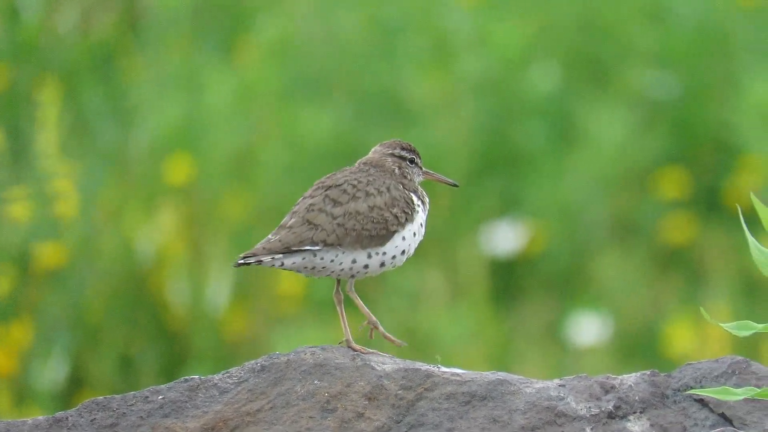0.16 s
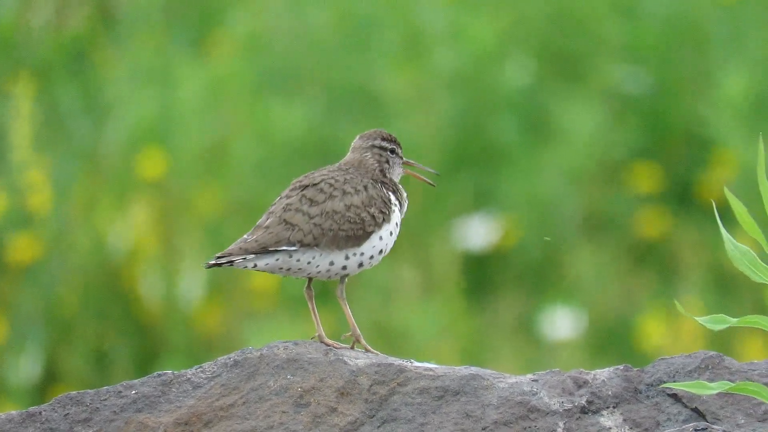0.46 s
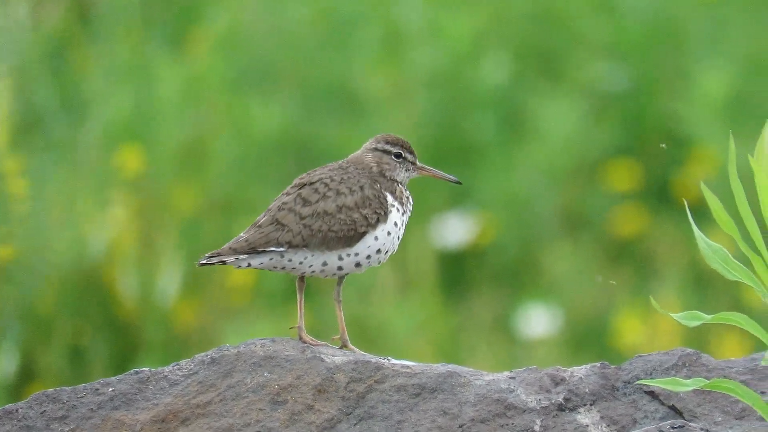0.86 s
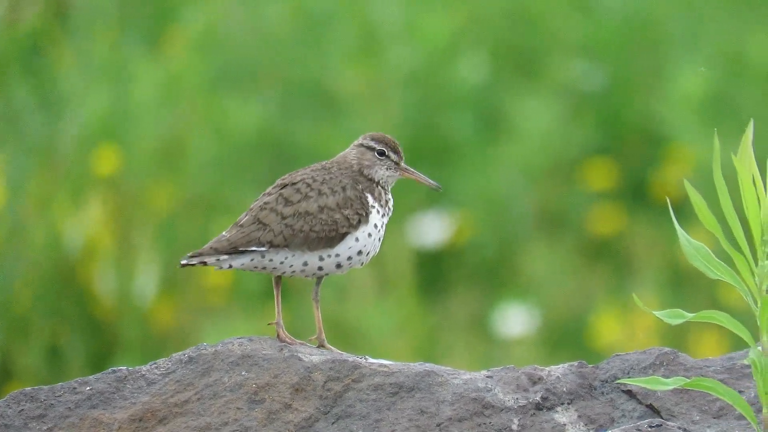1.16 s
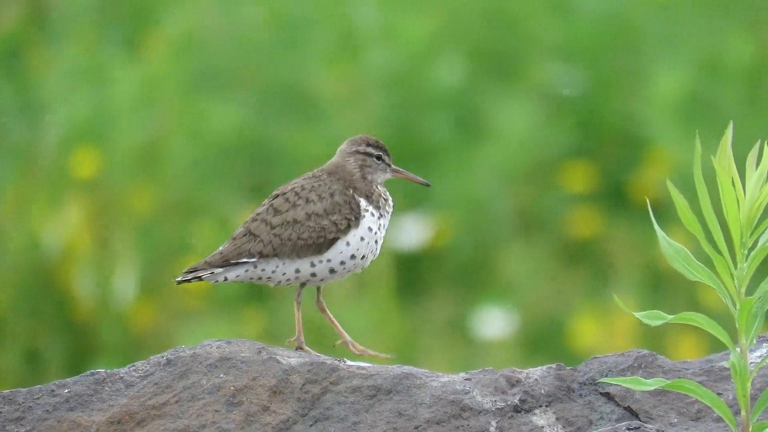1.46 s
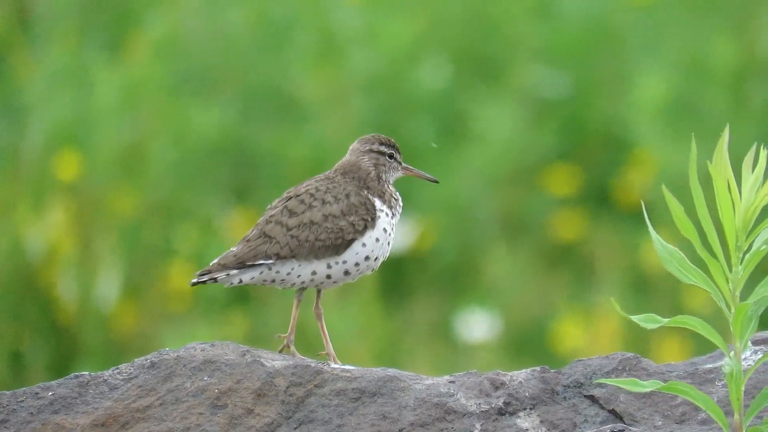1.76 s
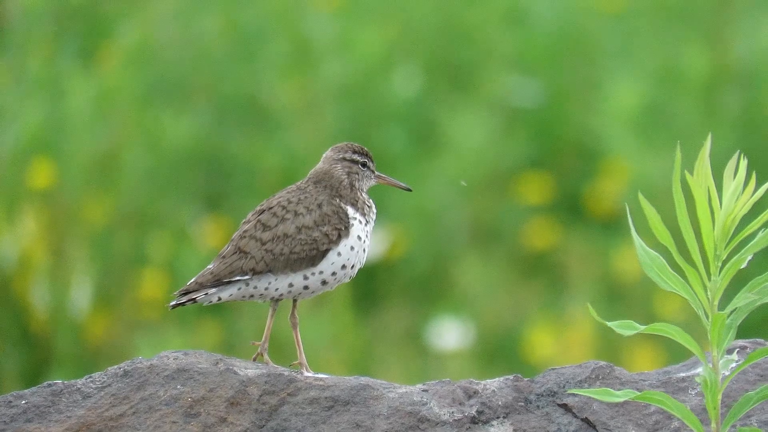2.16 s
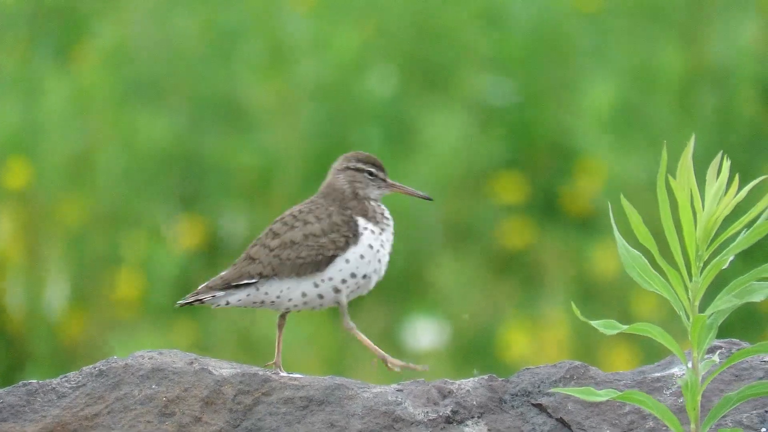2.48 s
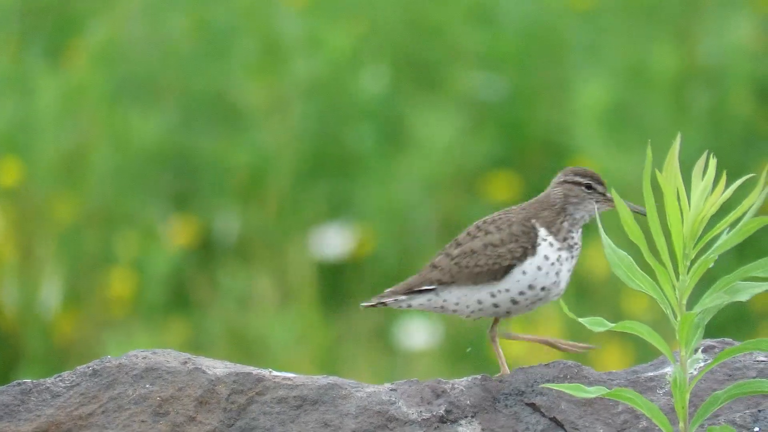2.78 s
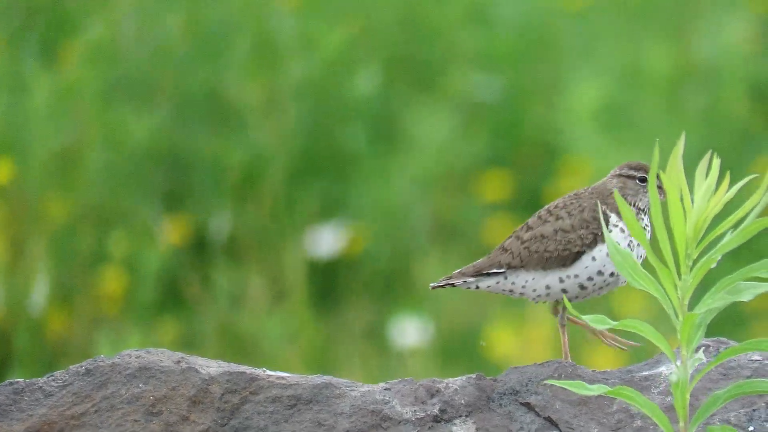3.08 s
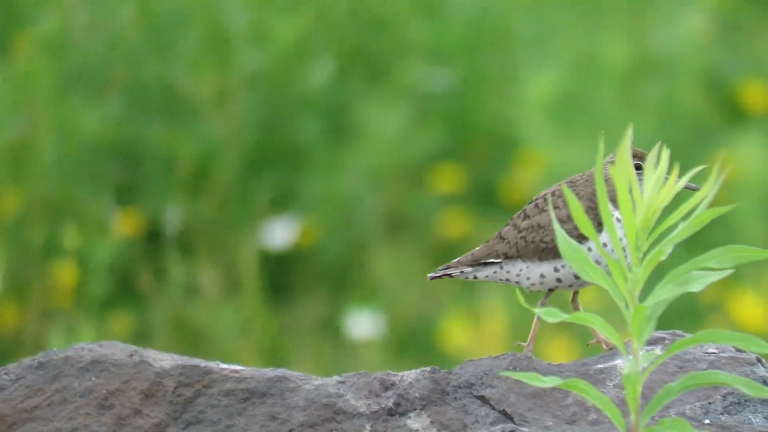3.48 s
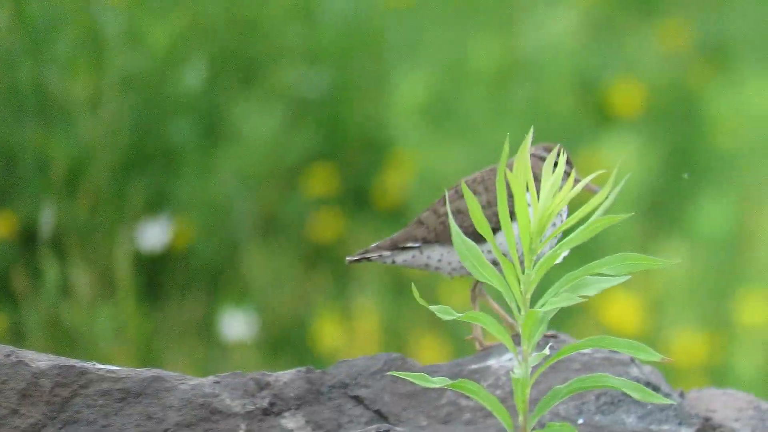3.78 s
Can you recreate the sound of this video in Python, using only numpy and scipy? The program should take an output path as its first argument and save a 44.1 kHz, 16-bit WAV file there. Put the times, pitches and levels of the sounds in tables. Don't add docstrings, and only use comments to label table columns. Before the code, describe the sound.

A small shorebird gives isolated high peeps, early, then before the middle, then late, with thin distant birdsong behind; steady low traffic hum, small handling clicks, and a burst of low wind buffeting on the camera microphone.

```python
import sys
import numpy as np
from scipy import signal
from scipy.io import wavfile
from scipy.ndimage import uniform_filter1d

SR = 44100
rng = np.random.default_rng(int(sys.argv[2]) if len(sys.argv) > 2 else 0)


def master_out(mix):
    frames = np.transpose(np.atleast_2d(mix))
    ceiling = np.clip(frames, -1, 1)
    pcm = np.round(ceiling * 32767).astype(np.int16)
    wavfile.write(sys.argv[1], SR, pcm)


def gain_from_db(level_db):
    decades = np.asarray(level_db, float) / 20
    return 10 ** decades


N = 173313


def evened(x):
    return x / np.sqrt(np.mean(x ** 2) + 1e-20)


def read(points, hz):
    f, value = np.transpose(points)
    return np.interp(np.log(hz + 1), np.log(f + 1), value)


def curve(points, column=1):
    return np.interp(np.arange(N) / SR, *np.transpose(points)[[0, column]])


def wobble(count, size):
    smooth = uniform_filter1d(rng.standard_normal(count), size)
    return evened(uniform_filter1d(smooth, size))


def add(mix, s, sound):
    part = mix[..., round(s * SR):][..., :sound.shape[-1]]
    part += sound[..., :part.shape[-1]]


def resonate(x, hz, width_hz):
    pole = np.exp((2j * np.pi * hz - np.pi * width_hz) / SR)
    return 2 * signal.lfilter([1 - abs(pole)], [1, -pole], x).real


def lowpass(order, hz):
    return signal.butter(order, hz, fs=SR, output="sos")


def sandpiper():
    # time_s, pitch_hz, level_db
    peeps = [
        [(.629, 1850, -62), (.637, 2130, -53), (.642, 2540, -52), (.648, 3200, -46), (.654, 3390, -43.5),
         (.664, 3551, -41), (.692, 3460, -47.5), (.7, 3300, -48), (.71, 2650, -50)],
        [(1.374, 2170, -52), (1.38, 2390, -44), (1.385, 2880, -40), (1.39, 3170, -47), (1.398, 3680, -40.5),
         (1.405, 3660, -43), (1.4075, 3420, -47), (1.411, 3280, -38), (1.432, 3230, -43.5), (1.441, 2800, -46)],
        [(2.846, 2010, -57), (2.854, 3100, -43), (2.86, 3900, -46), (2.87, 3928, -38.5), (2.898, 3920, -37.5),
         (2.906, 3880, -44), (2.913, 3880, -56)],
    ]
    # second_db, third_db
    overtones = [(-21.5, -48), (-21, -29), (-31, -28)]
    flutter_db = 3
    out = np.zeros(N)
    for peep, (second_db, third_db) in zip(peeps, overtones):
        s, hz, db = np.transpose(peep)
        t = np.arange(s[0], s[-1], 1 / SR)
        phase = 2 * np.pi * np.cumsum(np.interp(t, s, hz)) / SR
        level_db = np.interp(t, s, db)
        effort = gain_from_db((level_db - db.max()) * 0.43)
        upper = gain_from_db(second_db) * np.sin(2 * phase) + gain_from_db(third_db) * np.sin(3 * phase)
        tone = np.sin(phase) + effort * upper
        level = gain_from_db(level_db + flutter_db * wobble(len(t), size=110))
        level = level * signal.windows.tukey(len(t), 0.1)
        add(out, s[0], np.sqrt(2) * level * tone)
    return out + rock_scatter(out)


def rock_scatter(call):
    echo_db, t60_s, gap_s = -11.5, 0.1, 0.004
    t = np.arange(8000) / SR
    tail = rng.standard_normal((2, len(t))) * gain_from_db(-60 * t / t60_s) * (t > gap_s)
    tail = tail / np.linalg.norm(tail[0])
    return gain_from_db(echo_db) * signal.fftconvolve(call[None], tail, axes=1)[:, :N]


def whistle(length_s, db, start_hz, end_hz):
    # pitch_hz, left_minus_right_db
    whistle_pan = [
        (3300, 5),
        (3800, 3.2),
        (4400, -4.5),
    ]
    u = np.arange(0, 1, 1 / (length_s * SR))
    hz = (start_hz + (end_hz - start_hz) * u) * (1 + 0.0035 * wobble(len(u), size=300))
    swell = np.sin(np.pi * u ** 0.79) ** 0.61
    level = gain_from_db(db + 1.85 * wobble(len(u), size=500)) * swell
    side_db = read(whistle_pan, start_hz) / 2
    pan = gain_from_db(np.array([[side_db], [-side_db]]))
    return pan * np.sqrt(2) * level * np.sin(2 * np.pi * np.cumsum(hz) / SR)


def far_birds():
    # start_s, length_s, level_db,
    # start_hz, end_hz
    whistles = [(.722, .055, -62.5, 3570, 3510), (.87, 0.11, -59, 3310, 3250),
                (1.195, 0.17, -59, 4540, 4510), (1.969, 0.096, -60, 4400, 4380),
                (1.577, 0.13, -57.5, 4390, 4450), (1.7, 0.12, -68, 4440, 4440),
                (1.805, 0.025, -62, 4350, 3470), (1.818, 0.015, -58, 3370, 3320),
                (1.838, .016, -61, 3380, 3380), (.638, 0.0065, -57, 4300, 4870),
                (1.935, 0.27, -54, 3800, 3780), (2.325, 0.21, -49.5, 3720, 3760),
                (2.919, 0.027, -55, 3910, 3910), (3.591, 0.14, -58.5, 2620, 2700),
                (3.84, 0.058, -58.5, 5630, 5420)]
    # offset_s, length_s, level_db, start_hz, end_hz
    trill = [
        (.002, 0.02, -46.5, 2624, 2394),
        (0.067, 0.016, -65, 5800, 5350),
        (0.117, .014, -63, 7300, 6700),
        (.127, 0.012, -58, 6040, 4700),
    ]
    trill_start_s, turn_s, swell_db = 2.624, 0.1675, 0.5
    out = np.zeros((2, N))
    for s, *row in whistles:
        add(out, s, whistle(*row))
    for k in range(5):
        for offset_s, *row in trill:
            s = trill_start_s + k * turn_s + offset_s
            add(out, s, gain_from_db(swell_db * (k + 1.5)) * whistle(*row))
    return out


def wind_buffets():
    # centre_s, length_s, peak_db, swirl_hz, port_lag_turns
    buffets = [(1.69, 0.022, -23, 87, 0.32), (1.776, .025, -20.5, 129, 0.41), (1.97, 0.045, -30.5, 76, 0.2),
               (2.055, 0.037, -31, 152, 0.56), (2.27, 0.022, -21, 156.5, 0.3),
               (2.284, 0.036, -24, 68, 0.28), (2.62, 0.037, -31.5, 130, 0.42),
               (2.753, .022, -21, 151, 0.38), (2.799, 0.049, -28, 75, 0.22),
               (3.261, 0.027, -14.5, 106, 0.35), (3.277, .013, 5, 187, 0.4), (3.288, 0.017, -1, 132, 0.34),
               (3.315, 0.017, -13, 153, 0.22), (3.388, 0.12, -14.5, 98, 0.15),
               (3.43, .07, -13.5, 105.8, 0.062), (3.47, 0.055, -13.5, 161, 0.24),
               (3.515, .014, -11, 194, 0.25), (3.529, 0.016, -4.5, 200, 0.36),
               (3.594, 0.018, -10.5, 224, 0.37), (3.645, 0.016, -8.5, 286, 0.42),
               (3.668, 0.041, -20, 177, 0.37), (3.751, 0.054, -24, 132, 0.2)]
    swirl_rough, flap_db, flap_share = 0.15, -6.5, 1.48
    out = np.zeros((2, N))
    for s, length, db, hz, lag in buffets:
        t = np.arange(-length, length, 1 / SR)
        swirl_hz = [hz * (1 + swirl_rough * wobble(len(t), size=250)) for _ in "LR"]
        drift = np.cumsum(swirl_hz, axis=1) / SR
        turns = drift - drift[:, [len(t) // 2]] - [[0.25], [0.26 + lag]]
        flap = rng.standard_normal((2, len(t)))
        for _ in range(4):
            flap = resonate(flap, flap_share * hz, 1.39 * hz)
        flap = gain_from_db(flap_db) * min(length / 0.093, 1) * evened(flap)
        swell = np.exp(-(2 * t / length) ** 2)
        add(out, s - length, gain_from_db(db) * swell * (np.cos(2 * np.pi * turns) + flap))
    return out


def loose_wind():
    # time_s, level_db
    breeze = [(0, -73), (.75, -72), (.95, -44.5), (1.7, -49.5), (2.85, -43.5), (3.05, -55), (3.22, -63),
              (3.33, -23), (3.66, -24), (3.72, -50), (3.84, -64)]
    loose = rng.standard_normal((3, N))
    loose = loose[:2] + 1.13 * loose[2]
    loose = loose * gain_from_db(5.4 * np.array([wobble(N, size=1200) for _ in "LR"]))
    for _ in range(2):
        loose = resonate(loose, hz=113.7, width_hz=102)
    return evened(loose) * gain_from_db(curve(breeze))


def finger_creaks():
    # start_s, peak_db, ring_hz, edge_db, edge_hz
    creaks = [(0.062, -29, 1770, -22, 4000), (0.0844, -25, 1840, -37, 4000), (1.0443, -32, 2320, -16, 4000),
              (1.0776, -38.5, 1720, 4.5, 3970), (1.0935, -22.5, 2330, -13, 4460),
              (1.0961, -26, 1390, -11, 4930), (1.1038, -32, 2400, -5, 4500), (1.1166, -45, 2800, 4, 7000),
              (1.178, -45.5, 2000, 4.5, 4730), (1.2254, -37, 1820, -13, 8500),
              (1.2729, -29.5, 2120, -17, 4000), (1.3275, -36, 1880, -16, 8500),
              (1.4515, -37, 2200, -11, 8700), (1.4963, -31, 2130, -29, 4000), (1.535, -39, 1910, -17, 4030),
              (1.636, -33, 1960, -31, 4000), (1.7883, -31.5, 1910, -28, 4000),
              (2.7189, -28.5, 1560, 2.5, 5700), (2.7835, -25, 1880, -10, 3800),
              (2.792, -29, 2130, -7, 4000), (2.801, -32, 2160, 3, 4640), (2.848, -36, 1980, -10, 4000),
              (2.984, -34.5, 2300, -21, 4000), (2.992, -33, 2200, -22, 4000), (3.004, -36, 2000, -20, 4000),
              (3.0147, -30, 1900, -21, 4000), (3.05, -41, 2000, -19, 4000), (3.131, -36, 1900, -24, 4000),
              (3.1854, -38, 2000, -18, 4000), (3.194, -31, 1430, -21, 4000), (3.2206, -36, 1910, -16, 4000),
              (3.2327, -22, 1980, -22.5, 4000), (3.248, -27, 2170, -11.5, 4100),
              (3.265, -28, 2100, -13, 4000)]
    ring_t60_s, edge_t60_s, edge_gain_db, gain_db = 0.027, 0.025, 0.5, -6.5
    out = np.zeros((2, N))
    t = np.arange(1500) / SR
    attack = np.minimum(t / 0.001, 1)
    for s, db, hz, edge_db, edge_hz in creaks:
        noise = rng.standard_normal((4, len(t)))
        ring = resonate(resonate(noise[3], hz, 600), hz, 600)
        ring = evened(ring) * gain_from_db(-60 * t / ring_t60_s)
        edge = evened(resonate(noise[:3], edge_hz, 0.2 * edge_hz))
        edge = edge * gain_from_db(edge_db + edge_gain_db - 60 * t / edge_t60_s)
        ports = ring + 0.89 * edge[0] + 0.39 * edge[1:]
        add(out, s, gain_from_db(db + gain_db) * attack * ports)
    return out


def grip_rustle():
    # time_s, level_db
    grip = [(0, -52), (.12, -50), (.3, -62), (1.03, -60.5), (1.095, -42), (1.135, -51.5), (1.45, -47.5),
            (1.7, -57), (1.85, -59.5), (2.7, -59), (2.8, -45.5), (2.9, -50.5), (3.26, -49.5), (3.45, -54.5)]
    # pitch_hz, width_hz, level_db
    body_modes = [(1463, 220, 0.5), (1962, 620, 9.5), (2700, 490, -3), (4080, 1200, -3.5),
                  (6400, 3100, -11), (11000, 4300, -21.5)]
    slips_per_s, spread_db = 3000, 1
    slips = rng.standard_normal(N) * (rng.random(N) < slips_per_s / SR)
    slips = slips * gain_from_db(spread_db * np.minimum(rng.exponential(1, N), 4))
    other = np.array([np.roll(slips, 3001), np.roll(slips, 7001)])
    body = 0
    for hz, width_hz, db in body_modes:
        drive = slips * gain_from_db(3.46 * wobble(N, size=350)) + np.clip(hz / 9000, 0, 1.5) * other
        ring = resonate(resonate(drive, hz, width_hz), hz, width_hz)
        body = body + gain_from_db(db) * evened(ring)
    return evened(body) * gain_from_db(curve(grip))


def wash(spectrum, db, patchy_db):
    # pitch_hz, shared_part
    likeness = [(90, 1), (200, 0.78), (370, 0.51), (680, 0.9), (1260, 0.76), (4250, 0.37), (7820, 0.036)]
    hz = np.fft.rfftfreq(1024, 1 / SR)
    a, b, c, d, patches = rng.standard_normal((N // 256 + 5, 513, 5)).T
    patches = uniform_filter1d(patches, size=8, axis=0)
    patches = evened(uniform_filter1d(patches, size=10, axis=1))
    same = np.clip(read(likeness, hz), -1, 1)[:, None]
    left = a + 1j * b
    right = same * left + np.sqrt(1 - same ** 2) * (c + 1j * d)
    z = np.array([left, right]) * gain_from_db(read(spectrum, hz)[:, None] + patchy_db * patches)
    sound = signal.istft(z, nperseg=1024, noverlap=768)[1][:, :N]
    return gain_from_db(db) * evened(sound)


def traffic():
    # pitch_hz, level_db
    hum_spectrum = [(30, -15), (80, 0.22), (190, -7.5), (280, -13), (1050, -16.5), (1350, -61), (2400, -93)]
    hiss_spectrum = [(650, -24.5), (1150, 1.45), (2200, -6), (4000, -15), (11400, -32.5), (14800, -44)]
    # time_s, level_db, bass_db
    hum_drift = [(0, 0, -4.5), (.5, 0, -2.5), (3.1, 1.5, -4), (3.7, 4, 5.5), (3.93, -1.5, -21)]
    hum = wash(hum_spectrum, db=-37.5, patchy_db=1.15)
    bass = signal.sosfilt(lowpass(2, 250), hum)
    hum = hum + bass * (gain_from_db(curve(hum_drift, column=2)) - 1)
    return hum * gain_from_db(curve(hum_drift)) + wash(hiss_spectrum, db=-51.5, patchy_db=1.64)


def scene():
    birds = sandpiper() + far_birds()
    wind = wind_buffets() + loose_wind()
    handling = finger_creaks() + grip_rustle()
    return birds + wind + handling + traffic()


def wind_guard(band):
    start_s, top_hz = 3.802, 1100
    side = (band[0] - band[1]) / 2
    low = signal.sosfiltfilt(lowpass(4, top_hz), side) * (np.arange(N) > start_s * SR)
    return band - low * [[1], [-1]]


def gain_control():
    duck_s, duck_db, recover_db_per_s = 3.272, -9.5, 9.5
    after = np.arange(N) / SR - duck_s
    step = np.sin(np.pi / 2 * np.clip(after / 0.012, 0, 1)) ** 2
    return gain_from_db(step * np.minimum(duck_db + recover_db_per_s * after, 0))


def top_cut(x):
    return signal.sosfilt(signal.butter(12, 14970, fs=SR, output="sos"), x)


def record(dry):
    band = signal.sosfilt(signal.butter(4, 32, "high", fs=SR, output="sos"), dry)
    band = signal.sosfilt(lowpass(8, 13500), band)
    band = wind_guard(band) * gain_control()
    mix = 1.245 * np.tanh(band / 1.31)
    return top_cut(mix)


dry = scene()
out = record(dry)
master_out(out)
```